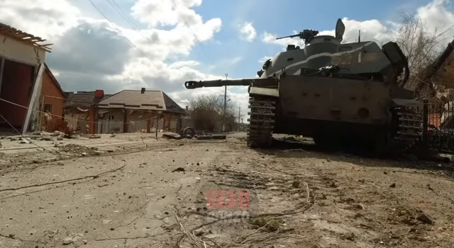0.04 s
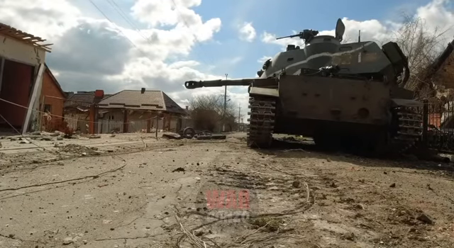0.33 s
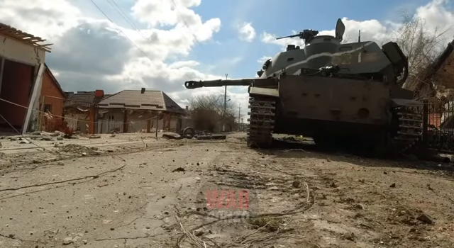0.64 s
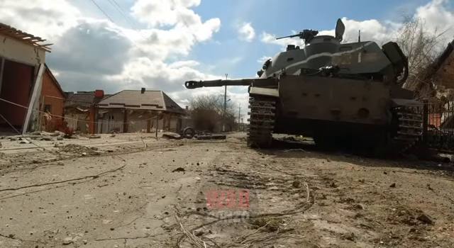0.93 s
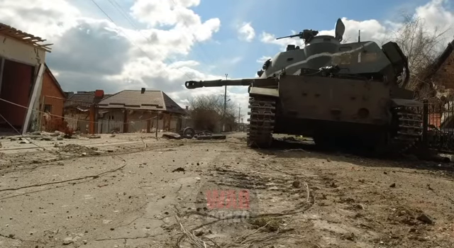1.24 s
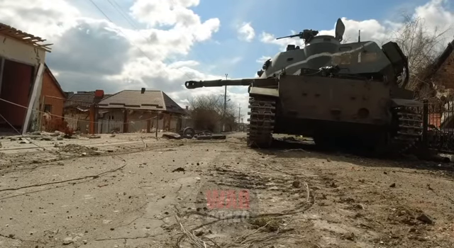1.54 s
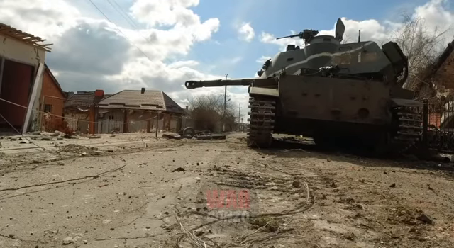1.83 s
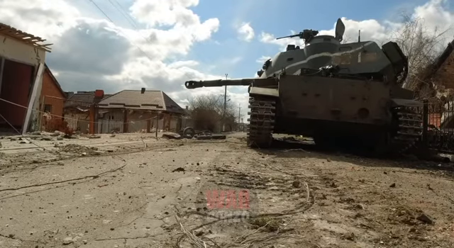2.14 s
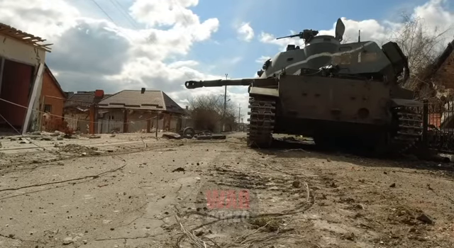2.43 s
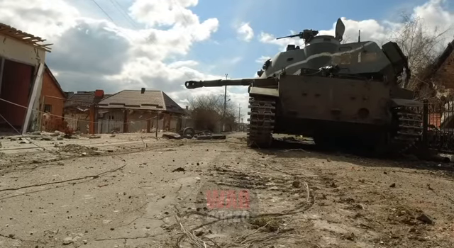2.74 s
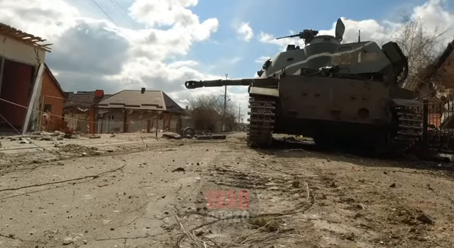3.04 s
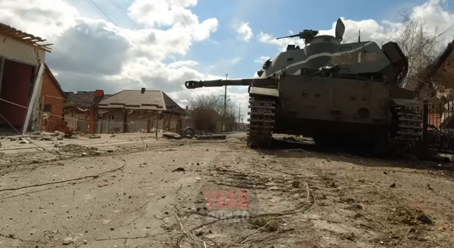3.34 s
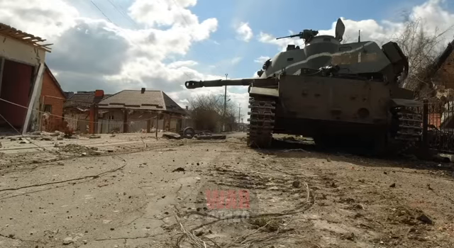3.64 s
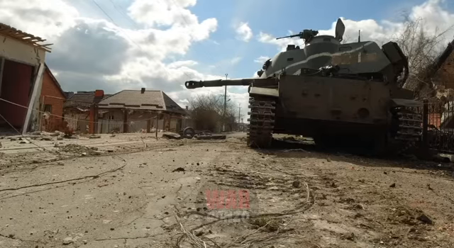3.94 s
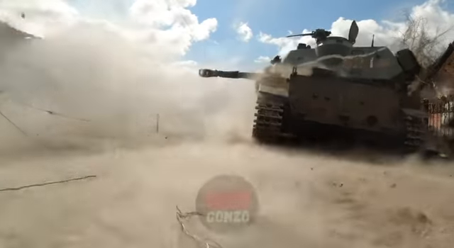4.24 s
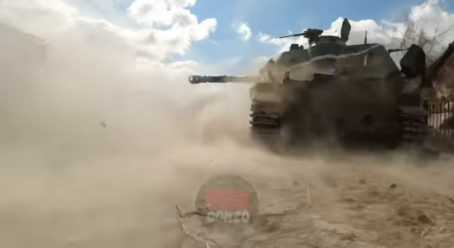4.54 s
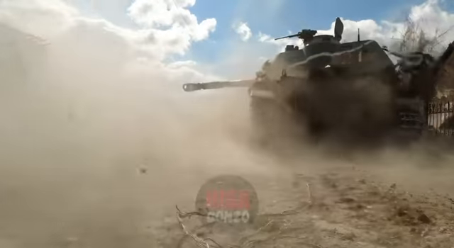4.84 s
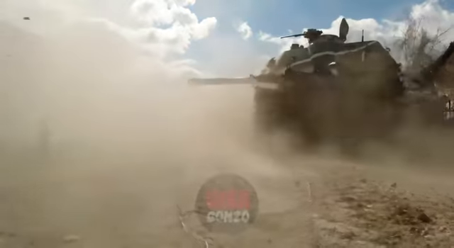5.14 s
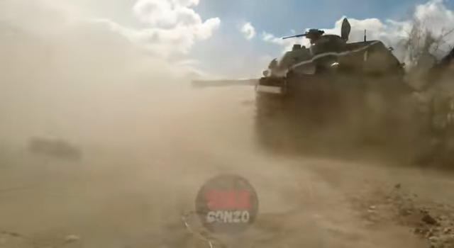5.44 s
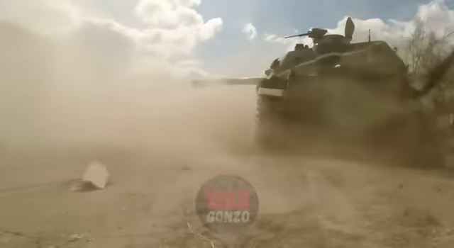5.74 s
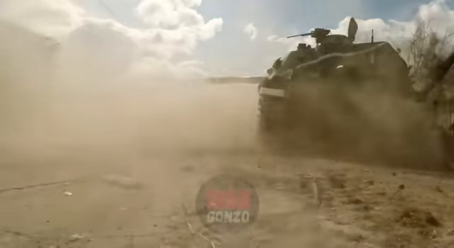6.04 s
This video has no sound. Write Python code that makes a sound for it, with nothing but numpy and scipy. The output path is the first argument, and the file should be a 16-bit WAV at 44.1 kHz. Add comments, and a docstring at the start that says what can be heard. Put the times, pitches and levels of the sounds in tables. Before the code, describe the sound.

A tank idles, then fires one huge, distorted cannon shot, followed by rolling echoes, falling grit and clanging steel.

```python
"""A village street: a diesel tank idles, then fires its main gun close to a microphone on the ground. The blast
and its wind overload the microphone, the shell bursts down the street, and the ground and the houses throw back
a boom and a roar. Grit and chips tick down, rubble knocks and crunches, and a piece of steel rings as it
bounces on the road."""
import sys
import numpy as np
from scipy import signal
from scipy.fft import rfft, irfft
from scipy.io import wavfile
from scipy.ndimage import uniform_filter1d

SR = 44100
rng = np.random.default_rng(int(sys.argv[2]) if len(sys.argv) > 2 else 0)


def int16_out(signal):
    """Quantize to a 16-bit WAV file."""
    q = np.round(np.clip(np.atleast_2d(signal).T, -1, 1) * 32767)
    wavfile.write(sys.argv[1], SR, q.astype(np.int16))


N = 273420
TIME = np.arange(N) / SR
SHOT_S = 4.094


def gain_of(db):
    """Decibels to amplitude."""
    return 10 ** (np.asarray(db) / 20)


def unit_rms(x):
    """Scales to rms 1."""
    return x / np.sqrt(np.mean(x ** 2) + 1e-20)


def coloured(x, spectrum):
    """Filters x by a curve of (Hz, dB) points, at rms 1."""
    hz, db = np.transpose(spectrum)
    bins = np.fft.rfftfreq(len(x), 1 / SR)
    response = gain_of(np.interp(np.log(bins + 1), np.log(hz), db))
    return unit_rms(irfft(rfft(x) * response, len(x)))


def drift(hz):
    """Random wander of rms 1, with rates up to about hz."""
    bins = np.fft.rfftfreq(N, 1 / SR)
    return unit_rms(irfft(rfft(rng.standard_normal(N)) * np.exp(-(bins / hz) ** 2), N))


def band(hz, width_hz):
    """Noise in one resonance, about width_hz to either side, at rms 1."""
    phase = 2 * np.pi * hz * TIME
    return unit_rms(drift(width_hz) * np.sin(phase) + drift(width_hz) * np.cos(phase))


def steadied(x, window_s):
    """Holds the running rms near 1."""
    size = max(int(window_s * SR), 2)
    power = uniform_filter1d(uniform_filter1d(x ** 2, size), size)
    return x / np.sqrt(abs(power) + 1e-9)


def surge(start_s, db, climb_db, attack_s, hold_s, fall_db_per_s):
    """Gain curve: climbs to db, holds, dies away."""
    t = TIME - start_s
    climb = climb_db * np.clip(1 - t / attack_s, 0, 1)
    fall = fall_db_per_s * np.maximum(t - attack_s - hold_s, 0)
    return gain_of(db - climb - fall) * np.clip(t / 0.0031, 0, 1)


def puff(centre_s, half_width_s, db):
    """Gain curve: one Gaussian swell."""
    return gain_of(db) * np.exp(-((TIME - centre_s) / half_width_s) ** 2)


def power_sum(gains):
    """Adds gain curves by power."""
    return np.sqrt(sum(gain ** 2 for gain in gains))


def add(mix, start_s, sound):
    """Mixes a sound in at start_s."""
    part = mix[round(start_s * SR):][:len(sound)]
    part += sound[:len(part)]


def street(x, wet_db, t60_s):
    """Adds sparse reflections from the ground, hull and house fronts."""
    t = np.arange(SR) / SR
    taps = rng.standard_normal(SR) * (rng.random(SR) < 2000 / SR)
    taps *= gain_of(-60 * t / t60_s) * (t > .004)
    return x + gain_of(wet_db) * signal.fftconvolve(x, taps / np.linalg.norm(taps))[:N]


# Exhaust tones. Each row: multiple of the four-stroke cycle rate, relative level in dB.
EXHAUST_TONES = [(6, -15), (9, -10), (10, -16), (12, 0), (16, -10), (18, -9), (21, -1)]
# Clatter throb. Each entry: multiple of the cycle rate.
FIRING_ORDERS = [5, 8, 12, 16]
# Diesel clatter. Each row: frequency in Hz, relative density in dB.
CLATTER_SPECTRUM = [(10, -16), (25, 1.5), (140, 3.5), (240, 0.5), (330, -4), (760, -3), (1150, -4.5),
                    (1750, -8.5), (2150, -19), (3100, -25), (3900, -35), (4600, -46.5), (6300, -50),
                    (9000, -64), (12000, -57)]
# Engine deck resonances. Each row: frequency in Hz, half-width in Hz, level in dB.
DECK_MODES = [(324, 4, -68), (473.5, 16, -55.5), (757, 98, -51), (1100, 27, -54), (1554, 42, -59.5),
              (2374, 23, -65), (2590, 38, -72), (3800, 48, -71.5)]


def engine(cycle_hz=5.465, wander=0.0036, throb=0.12, knock=0.06, flutter_db=0.74):
    """Twelve cylinders idle: exhaust tones, clatter throbbing with uneven firing, a ringing deck."""
    cycles = np.cumsum(cycle_hz * (1 + wander * drift(0.96))) / SR
    exhaust = np.zeros(N)
    for order, db in EXHAUST_TONES:
        level = gain_of(db) * (1 + throb * drift(5.5))
        exhaust += level * np.sin(2 * np.pi * (order * cycles + rng.random()))
    firing = sum(np.cos(2 * np.pi * (order * cycles + rng.random())) for order in FIRING_ORDERS)
    clatter = coloured(street(rng.standard_normal(N), wet_db=-9.5, t60_s=0.091), CLATTER_SPECTRUM)
    clatter *= (1 + knock * firing) * gain_of(flutter_db * drift(29))
    deck = sum(gain_of(db) * band(hz, width_hz) for hz, width_hz, db in DECK_MODES)
    dip_after_shot = gain_of(-3.5 * np.clip((TIME - SHOT_S) / .5, 0, 1))
    return gain_of(-36.5) * unit_rms(exhaust) + (gain_of(-35.5) * clatter + deck) * dip_after_shot


# Each row: centre in seconds, half-width in seconds, frequency in Hz, level in dB.
IDLE_SWELLS = [(0.34, 0.059, 99.4, -32), (.92, 0.048, 116.5, -37), (1.653, 0.1, 90.86, -33)]


def swells():
    """The idle's low rumble heaves now and then."""
    return sum(band(hz, 32) * puff(s, half_width_s, db) for s, half_width_s, hz, db in IDLE_SWELLS)


# Each row: start in seconds, length in seconds, start and end pitch in Hz, level in dB.
SQUEAK_GLIDES = [(0.162, 0.2, 2590, 2590, -54), (.36, .1, 3200, 3240, -56), (1.82, 0.091, 3200, 3150, -54),
                 (2.188, 0.12, 2640, 2540, -53), (3.148, 0.09, 2630, 2560, -59),
                 (3.72, .23, 2690, 2410, -51), (3.784, 0.13, 3030, 2800, -56),
                 (3.919, 0.22, 2900, 2800, -60)]


def squeaks(flutter=0.53):
    """Faint, unsteady tones swell and fade; most sag in pitch."""
    out = np.zeros(N)
    for start_s, length_s, start_hz, end_hz, db in SQUEAK_GLIDES:
        progress = np.linspace(0, 1, int(length_s * SR))
        hz = start_hz + (end_hz - start_hz) * progress ** 2
        tone = np.sin(2 * np.pi * np.cumsum(hz) / SR)
        add(out, start_s, gain_of(db) * np.sin(np.pi * progress) * tone)
    return street(out * (0.76 + flutter * drift(60)), wet_db=-3, t60_s=0.16)


def scuff():
    """A brief soft rasp of metal."""
    rasp = band(2900, 110) + 1.3 * band(2350, 110) + 0.51 * band(3740, 200) + 0.092 * band(5200, 1200)
    return unit_rms(rasp) * puff(centre_s=0.858, half_width_s=0.044, db=-49)


def chips(per_s=330, spread_db=5, pitches=30):
    """Small hard chips tick, each at its own pitch; most land after a short flight."""
    out, t = np.zeros(N), np.arange(SR // 50) / SR
    for hz in np.geomspace(3800, 11200, pitches):
        hits = np.zeros(N)
        at = rng.integers(0, N, int(per_s / pitches * N / SR))
        hits[at] = gain_of(spread_db * np.minimum(rng.exponential(1, len(at)), 3))
        tick = np.sin(2 * np.pi * hz * t) * np.exp(-hz * t / 3)
        out += signal.oaconvolve(hits, tick)[:N]
    falling = surge(SHOT_S, db=-42, climb_db=26, attack_s=0.77, hold_s=0.034, fall_db_per_s=22.5)
    return unit_rms(street(out, wet_db=4, t60_s=0.16)) * falling


# Grains of dirt. Each row: frequency in Hz, relative density in dB.
GRIT_SPECTRUM = [(500, 14), (2000, 9), (4500, 7), (7000, -0.5), (9000, 1.5), (10800, 2), (12000, -5)]
# Each row: centre in seconds, half-width in seconds, grit level in dB, sand level in dB.
DIRT_SHOWERS = [(4.782, 0.037, -35, -43.5), (4.868, 0.035, -37, -38.5), (4.945, .06, -48, -60),
                (5.155, 0.091, -42, -73), (5.306, 0.06, -47, -52), (5.503, 0.083, -41.5, -56),
                (5.76, 0.12, -51.5, -75), (6.038, 0.022, -54, -75), (6.195, 0.022, -43, -70)]


def grit(per_s=3500, spread_db=0.5, sand_hz=10400, sand_width_hz=550):
    """Grains spray out with the blast and come down in showers; the finest sand sizzles."""
    sizes = gain_of(spread_db * np.minimum(rng.exponential(1, N), 5)) * rng.standard_normal(N)
    ticks = street(sizes * (rng.random(N) < per_s / SR), wet_db=20, t60_s=0.17)
    spray = surge(SHOT_S, db=-22, climb_db=8, attack_s=0.027, hold_s=0.029, fall_db_per_s=37.5)
    grit_gain = power_sum([spray] + [puff(s, half_width_s, db) for s, half_width_s, db, _ in DIRT_SHOWERS])
    sand_gain = power_sum(puff(s, half_width_s, db) for s, half_width_s, _, db in DIRT_SHOWERS)
    return coloured(ticks, GRIT_SPECTRUM) * grit_gain + band(sand_hz, sand_width_hz) * sand_gain


# Each row: start in seconds, knock level in dB, main mode in Hz, its T60 in seconds, crunch level in dB.
RUBBLE_HITS = [(4.697, -5, 1000, 0.012, -42), (4.762, -21, 714, 0.08, -25),
               (4.924, -46, 2280, 0.034, -21.5), (4.949, -29, 2980, 0.064, -44),
               (4.999, -27.5, 3010, 0.079, -38), (5.113, -26, 1050, 0.097, -26),
               (5.116, -18.5, 3650, 0.045, -19.5), (5.131, -23, 1900, 0.054, -25),
               (5.146, -15, 1400, 0.026, -19.5), (5.155, -30, 3100, .03, -16.5),
               (5.188, -24, 1790, 0.07, -23.5), (5.204, -18, 1040, 0.14, -48),
               (5.284, -26.5, 683, 0.081, -25), (5.293, -18.5, 402, 0.039, -22.5),
               (5.319, -48, 1100, 0.046, -28.5), (5.354, -51, 1400, 0.035, -38),
               (5.422, -15.5, 844, 0.12, -36), (5.424, -22.5, 2330, 0.036, -53),
               (5.447, -27, 1160, 0.09, -28.5), (5.539, -17.5, 821, 0.1, -33),
               (5.679, -28.5, 2440, .06, -55)]


def rubble(side_db=-5, side_t60_s=0.051, crunch_t60_s=0.025, crumble=0.69, contact_s=0.00061, modes=30):
    """Each piece rings at one main mode among many short ones and crunches the dirt."""
    out, t = np.zeros(N), np.arange(SR // 3) / SR
    for start_s, knock_db, hz, t60_s, crunch_db in RUBBLE_HITS:
        side_hz = np.geomspace(550, 4200, modes) * rng.uniform(0.71, 1.6, modes)
        nearness = np.minimum(side_hz / hz, hz / side_hz)  # modes near the main one ring most
        sides = unit_rms(np.sin(2 * np.pi * (side_hz * t[:, None] + rng.random(modes))) @ nearness)
        sides *= gain_of(side_db - 60 * t / min(t60_s, side_t60_s))
        decay = gain_of(-60 * t / t60_s)
        ring = (np.sin(2 * np.pi * hz * t) * decay + sides) * (1 - np.exp(-t / contact_s))
        # the piece crumbles and touches down several more times
        touches = crumble * rng.standard_normal(len(t)) * (rng.random(len(t)) < 300 / SR) * decay
        touches[0] += 1
        knock = signal.fftconvolve(ring, touches / np.linalg.norm(touches))[:len(t)]
        crunch = coloured(rng.standard_normal(len(t)), GRIT_SPECTRUM)
        crunch *= gain_of(crunch_db - 60 * t / crunch_t60_s)
        add(out, start_s, gain_of(knock_db) * knock + crunch)
    return street(out, wet_db=-12, t60_s=0.1)


# Each row: frequency in Hz, relative level in dB, base T60 in seconds.
STEEL_MODES = [(814, 1.5, 0.58), (1027, 1, 0.51), (1295, -18.5, .2), (1553, 7.5, 0.29), (1570, -8, .2),
               (1900, 9.5, 0.12), (2065, 0, .25), (2135, 13.5, 0.19), (2390, 2, 0.13), (2440, -12, 0.16),
               (2816, 12, 0.1), (2930, -4, 0.19), (3060, 0, 0.17), (3530, -4.5, 0.29), (4150, -23, 0.13),
               (4370, -22, 0.15), (4570, -16, 0.23), (5420, -26, 0.14)]
# Each row: start in seconds, ring level in dB, factor on T60, scrape level in dB.
STEEL_BOUNCES = [(5.772, -20.5, 0.53, -27), (5.79, -26, 0.36, -29.5), (5.804, -25, 0.52, -24.5),
                 (5.833, -18.5, 0.45, -28), (5.948, -25, 0.97, -39), (5.97, -33.5, 2, -45),
                 (5.989, -21, 0.33, -35.5), (6.028, -34, 1.2, -30.5), (6.048, -43, 0.41, -33),
                 (6.066, -19, 0.3, -39), (6.127, -30.5, 1, -56)]
# Steel on road. Each row: frequency in Hz, relative density in dB.
SCRAPE_SPECTRUM = [(300, -11), (900, 9), (1600, 6.5), (3000, 1.5), (4800, -5), (6300, -26), (11000, -35)]


def steel(scrape_t60_s=0.078, contact_s=0.0004, detune=0.0075):
    """Each bounce scrapes and loads the piece differently, shifting its modes and ring times."""
    out, t = np.zeros(N), np.arange(SR // 2) / SR
    hz, mode_db, t60_s = np.transpose(STEEL_MODES)
    for start_s, ring_db, t60_factor, scrape_db in STEEL_BOUNCES:
        strike = gain_of(mode_db) * rng.uniform(0.9, 0.93, len(hz)) * rng.choice([-1, 1], len(hz))
        loaded_hz = hz * (1 + detune * rng.standard_normal(len(hz)))
        decay = gain_of(-60 * t[:, None] / (t60_s * t60_factor))
        modes = np.sin(2 * np.pi * loaded_hz * t[:, None]) * decay
        ring = gain_of(ring_db) * modes @ strike / np.linalg.norm(strike)
        crack = 1 + 2 * np.exp(-t / 0.0013)  # the first touch is the hardest
        scrape = coloured(rng.standard_normal(len(t)), SCRAPE_SPECTRUM)
        scrape *= gain_of(scrape_db - 60 * t / scrape_t60_s) * crack
        add(out, start_s, (ring + scrape) * (1 - np.exp(-t / contact_s)))
    return street(out, wet_db=-11.5, t60_s=0.3)


# Near boom, boom off the far houses, roar. Each row: frequency in Hz, relative density in dB.
BOOM_SPECTRUM = [(30, -3.5), (110, 2), (250, 1.5), (380, -4.5), (600, -17.5), (1200, -36), (3000, -101),
                 (8000, -80)]
FAR_BOOM_SPECTRUM = [(30, -3), (90, -18), (140, 1), (240, 2), (400, -7), (650, -14), (1200, -44),
                     (3000, -61), (8000, -80)]
ROAR_SPECTRUM = [(100, -24), (400, 17.5), (900, 13.5), (1500, 7.5), (3000, 3), (5000, -10), (7000, -23),
                 (11000, -51)]
# Single echoes: the first off the ground, the rest off house fronts. Each row: start, attack and hold in
# seconds, fall in dB per second, boom and roar levels in dB.
ECHO_RETURNS = [(4.138, 0.0094, .01, 150, -14, -17.5), (4.183, 0.025, .13, 218, -5, -11.5),
                (4.402, 0.016, .02, 152, -5, -18), (4.471, 0.032, 0.014, 74, -2.5, -15),
                (5.257, 0.027, 0.016, 197, -22.5, -52), (5.418, 0.019, 0.012, 50, -25.5, -44),
                (6.178, 0.024, .03, 102, -24, -32.5)]


def echoes(ragged_db=1.5, near_until_s=4.6, far_from_s=5.2):
    """The ground and the houses scatter shot and burst as a deep boom, thinning with distance, and a ragged
    roar."""
    near = steadied(coloured(rng.standard_normal(N), BOOM_SPECTRUM), window_s=0.021)
    far = steadied(coloured(rng.standard_normal(N), FAR_BOOM_SPECTRUM), window_s=0.056)
    far_share = np.clip((TIME - near_until_s) / (far_from_s - near_until_s), 0, 1)
    boom = np.sqrt(1 - far_share) * near + np.sqrt(far_share) * far
    roar = coloured(street(rng.standard_normal(N), wet_db=-4.5, t60_s=0.039), ROAR_SPECTRUM)
    roar *= gain_of(ragged_db * drift(134))
    # beneath the single echoes, boom and roar each roll on in two waves
    boom_gains = [surge(SHOT_S, db=-25, climb_db=17, attack_s=0.33, hold_s=0.58, fall_db_per_s=110),
                  surge(SHOT_S, db=-34.5, climb_db=10, attack_s=0.48, hold_s=1.12, fall_db_per_s=7.5)]
    roar_gains = [surge(SHOT_S, db=-22.5, climb_db=2.5, attack_s=0.18, hold_s=0.2, fall_db_per_s=22),
                  surge(SHOT_S, db=-30.5, climb_db=3, attack_s=0.757, hold_s=0.14, fall_db_per_s=124)]
    for start_s, attack_s, hold_s, fall, boom_db, roar_db in ECHO_RETURNS:
        shape = surge(start_s, db=0, climb_db=15, attack_s=attack_s, hold_s=hold_s, fall_db_per_s=fall)
        boom_gains.append(gain_of(boom_db) * shape)
        roar_gains.append(gain_of(roar_db) * shape)
    return boom * power_sum(boom_gains) + roar * power_sum(roar_gains)


# Wind on the microphone. Each row: frequency in Hz, relative density in dB.
BUFFET_SPECTRUM = [(8, -23), (22, -3), (42, 0.5), (66, -0.5), (110, -12), (220, -26), (500, -42.5),
                   (2000, -50), (8000, -94)]
# Brief swells of the fading rumble. Each row: centre in seconds, half-width in seconds, level in dB.
LOW_RUMBLE_SWELLS = [(4.742, 0.018, -5.5), (4.829, 0.029, -7.5), (4.896, 0.017, -10), (5.07, 0.018, -18),
                     (5.278, 0.029, -17), (5.42, 0.042, -22.5), (5.497, 0.051, -26.5), (5.986, 0.068, -27),
                     (6.176, 0.036, -31)]


def blast_wind(drum_hz=122, drum_width_hz=14, drum_db=-9):
    """A rush of air buffets the microphone, drumming at its peak; a low rumble fades in brief swells."""
    rush = surge(SHOT_S, db=3, climb_db=44, attack_s=0.2, hold_s=0.271, fall_db_per_s=168)
    tail = surge(SHOT_S, db=-14.5, climb_db=15, attack_s=0.34, hold_s=.42, fall_db_per_s=43)
    strength = power_sum([rush, tail] + [puff(*swell) for swell in LOW_RUMBLE_SWELLS])
    drum = gain_of(drum_db) * band(drum_hz, drum_width_hz) * np.minimum(strength, 1)
    buffet = coloured(rng.standard_normal(N), BUFFET_SPECTRUM)
    return steadied(buffet + drum, window_s=0.17) * strength


# The shot, then reports from down the street. Each row: start in seconds, shock gain in dB,
# shock length in seconds, crash gain in dB, crash T60 in seconds.
EXPLOSIONS = [(4.1035, 1.5, 0.017, -14, 0.2), (4.435, -5, 0.0044, 3.5, 0.081),
              (4.491, 4, 0.0036, -6.5, 0.24)]


def explosions(front_s=.0005, rise_s=0.0057):
    """Each explosion is a shock with a suction phase, and a crash that swells and dies."""
    out, t = np.zeros(N), np.arange(SR) / SR
    for start_s, shock_db, length_s, crash_db, t60_s in EXPLOSIONS:
        shock = (1 - np.exp(-t / front_s)) * (1 - t / length_s) * np.exp(-t / length_s)
        roar = coloured(rng.standard_normal(SR), ROAR_SPECTRUM)
        boom = coloured(rng.standard_normal(SR), BOOM_SPECTRUM)
        crash = (roar + boom) * gain_of(crash_db - 60 * t / t60_s) * (1 - np.exp(-t / rise_s))
        add(out, start_s, crash - gain_of(shock_db) * shock)
    return out


def scene():
    """Tank, shot and debris at one microphone."""
    tank = engine() + swells() + squeaks() + scuff()
    shot = explosions() + echoes() + blast_wind()
    return (tank + shot + grit() + chips() + rubble() + steel())[None]


def record(dry, ceiling=0.835, low_hz=1.5, rasp_hz=2500, edge_hz=11750, dry_leak=.014, rasp_leak=.18):
    """The microphone saturates into near-square waves with sagging, rasping tops; a low-pass follows."""
    squashed = dry / (1 + (dry / ceiling) ** 6) ** (1 / 6)
    rasp = signal.lfilter(*signal.butter(1, rasp_hz, "high", fs=SR), dry - squashed)
    overloaded = squashed + dry_leak * dry + rasp_leak * rasp
    sagging = signal.lfilter(*signal.butter(1, low_hz, "high", fs=SR), overloaded)
    limited = np.clip(sagging, -.97, .97)
    low_pass = signal.firwin(301, edge_hz, window=("kaiser", 7), fs=SR)
    return signal.oaconvolve(limited, low_pass[None], "same")


dry = scene()
out = record(dry)
int16_out(out)
```